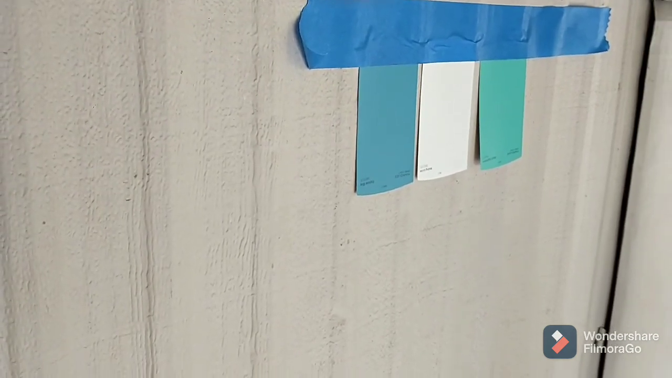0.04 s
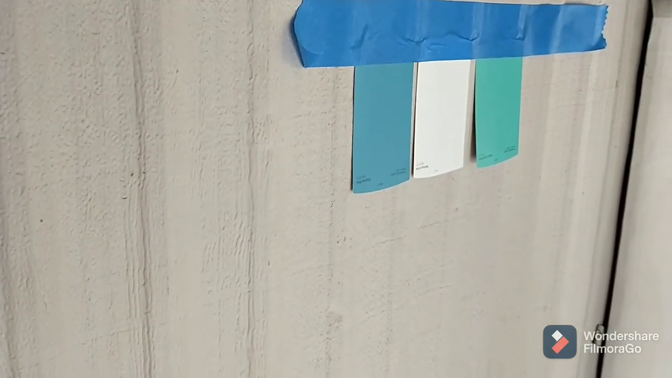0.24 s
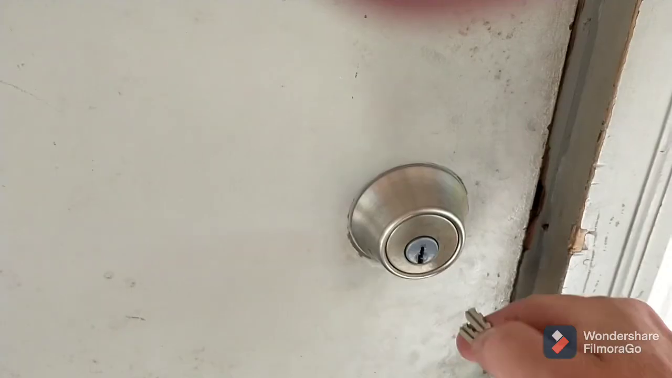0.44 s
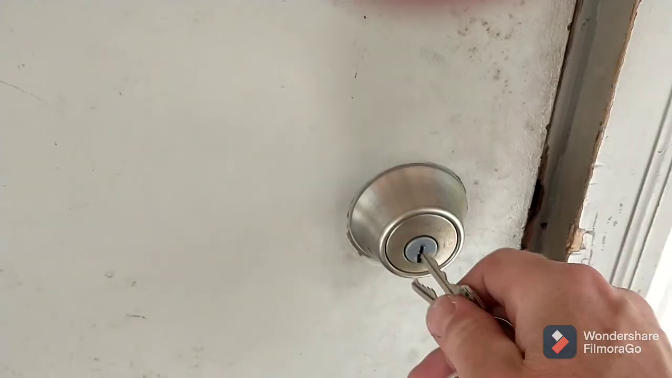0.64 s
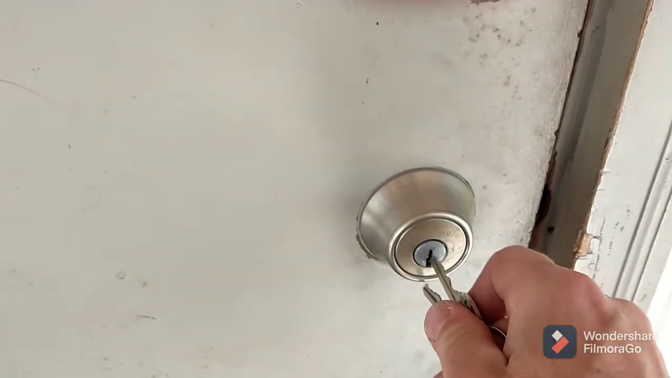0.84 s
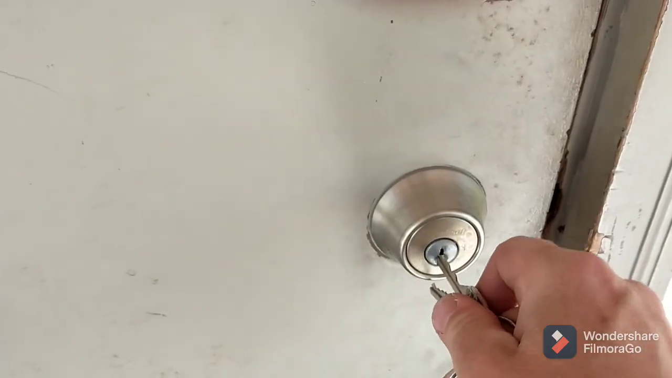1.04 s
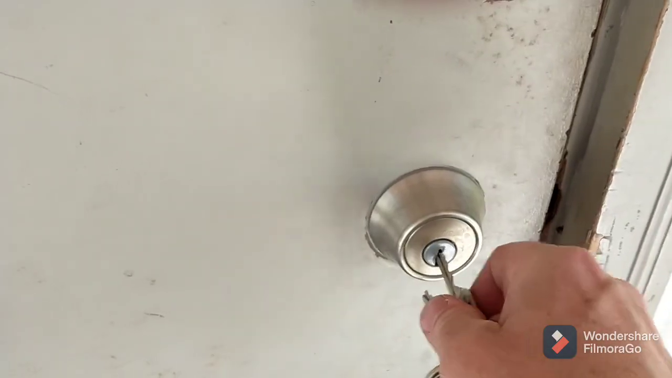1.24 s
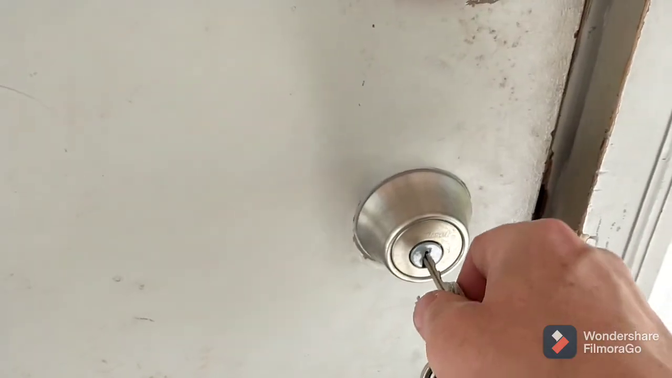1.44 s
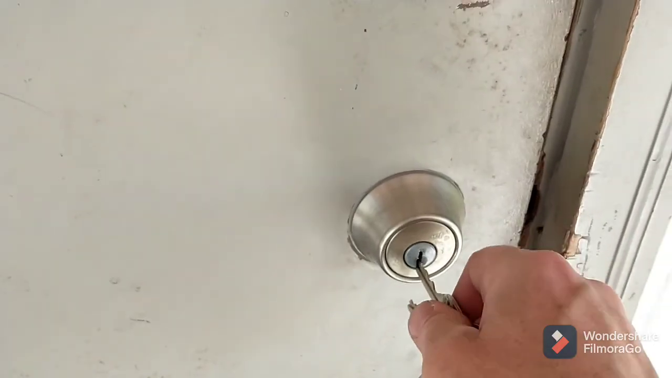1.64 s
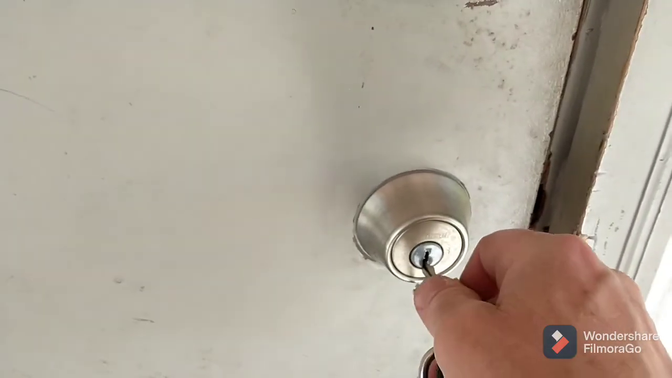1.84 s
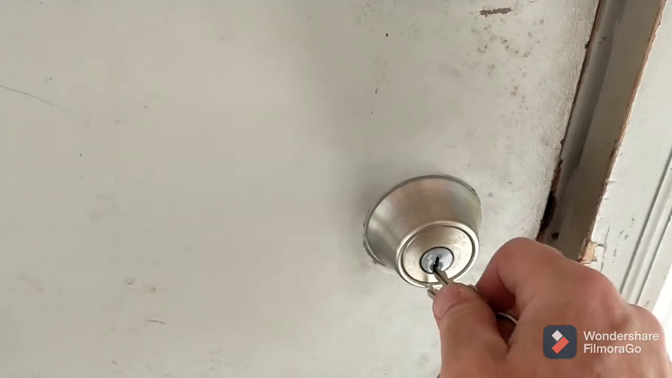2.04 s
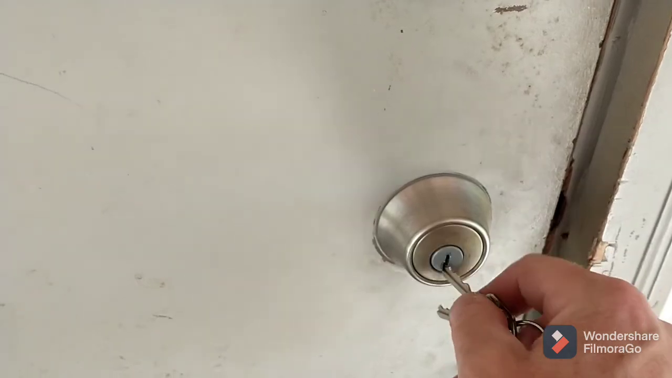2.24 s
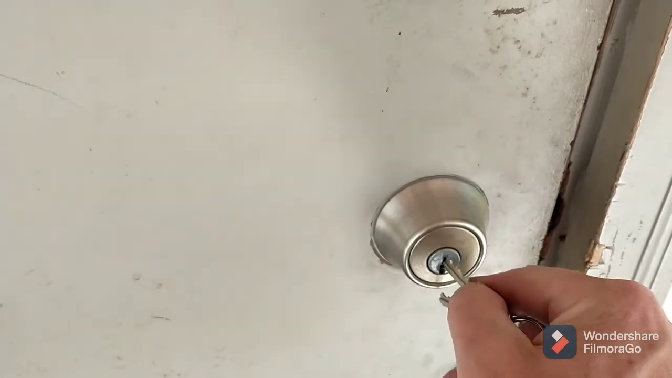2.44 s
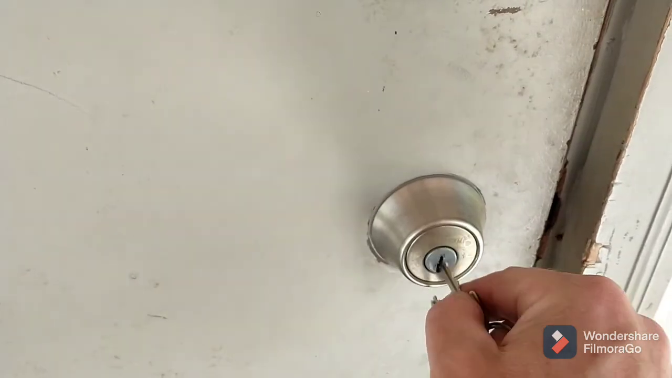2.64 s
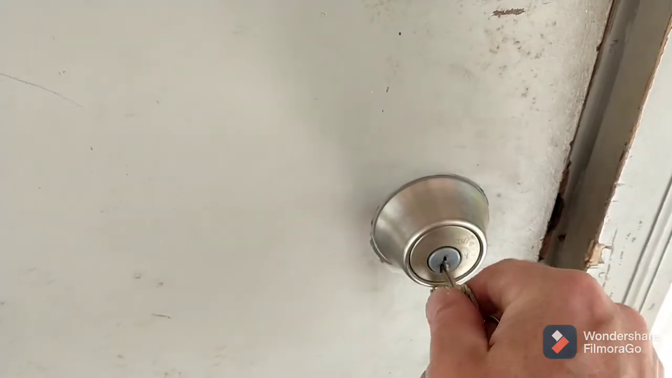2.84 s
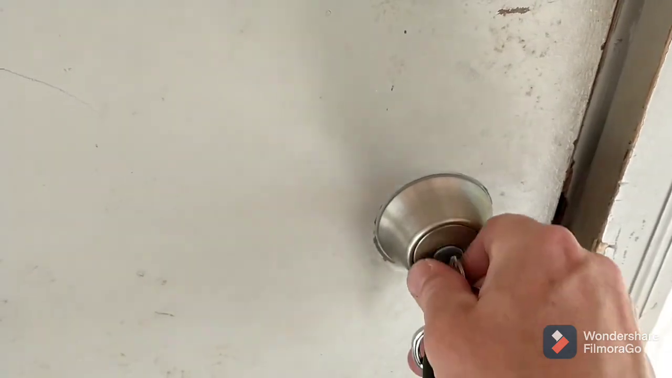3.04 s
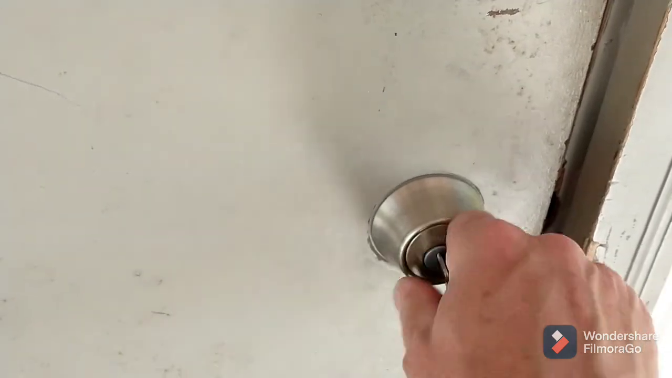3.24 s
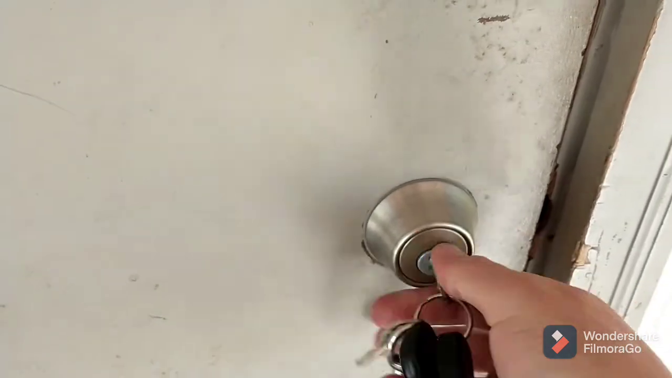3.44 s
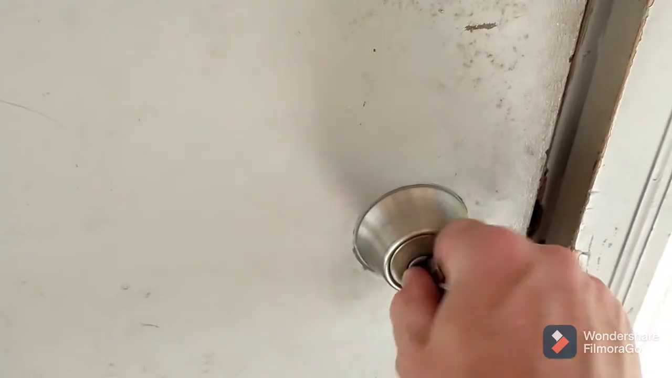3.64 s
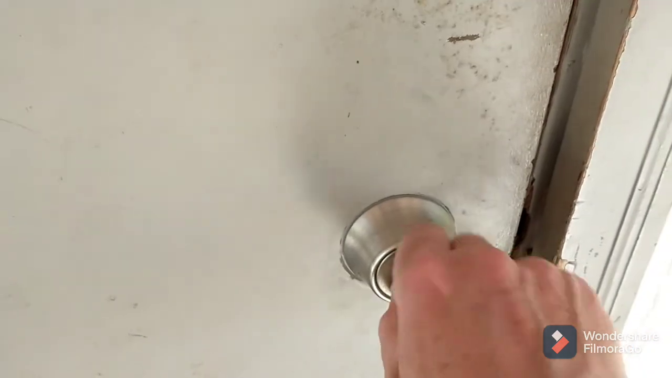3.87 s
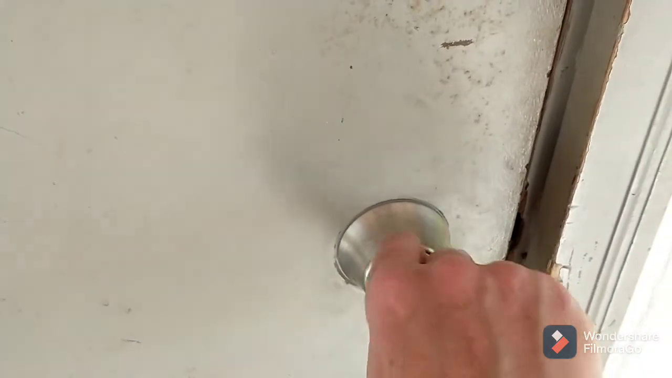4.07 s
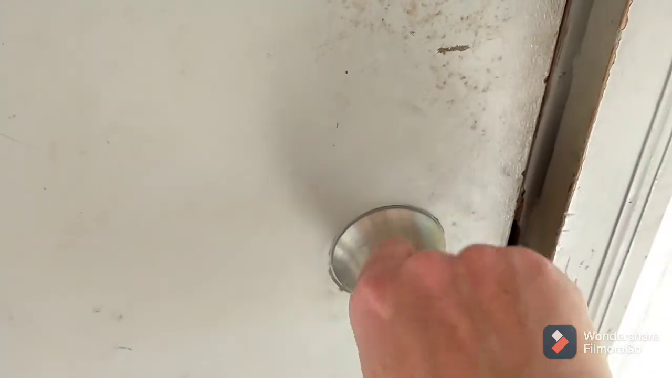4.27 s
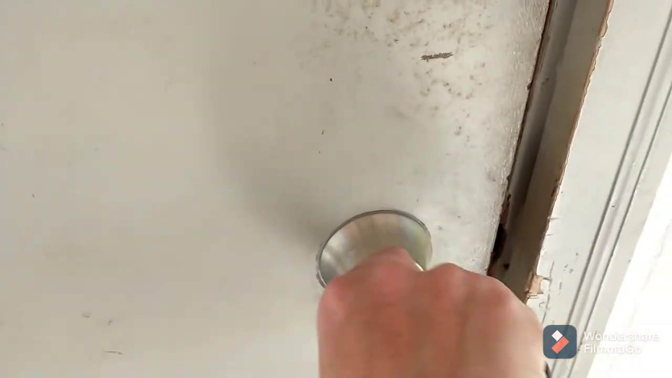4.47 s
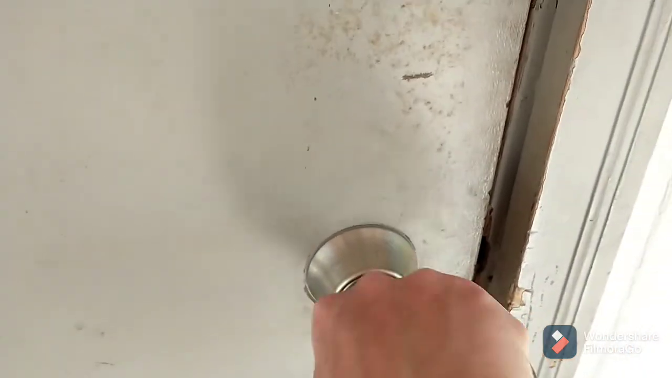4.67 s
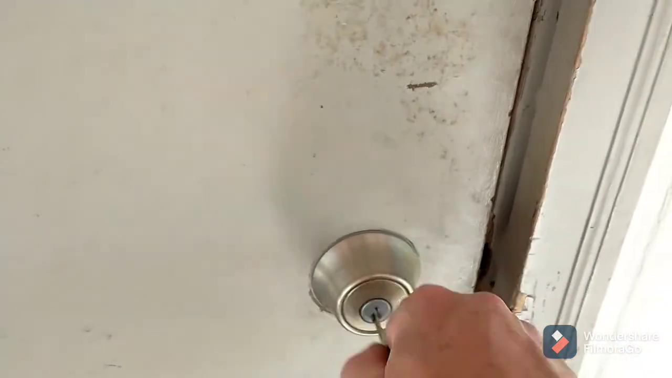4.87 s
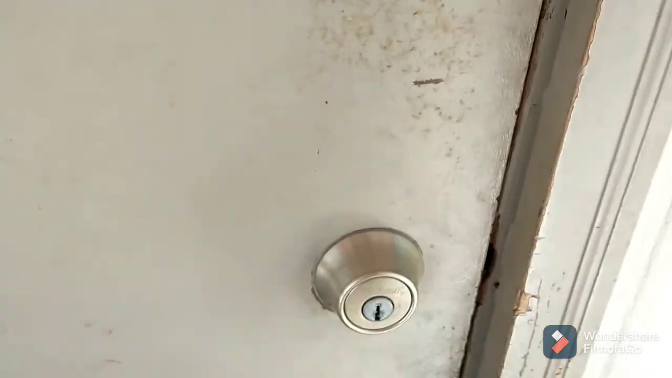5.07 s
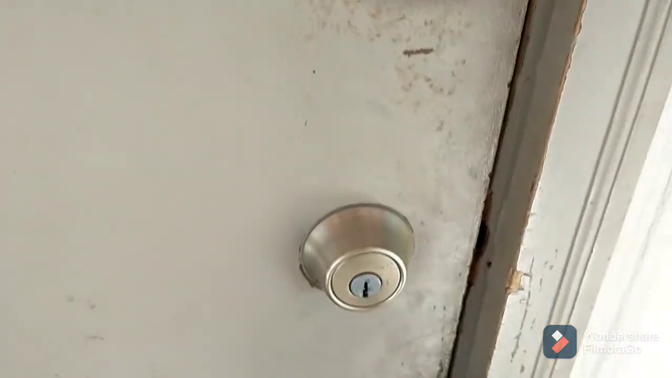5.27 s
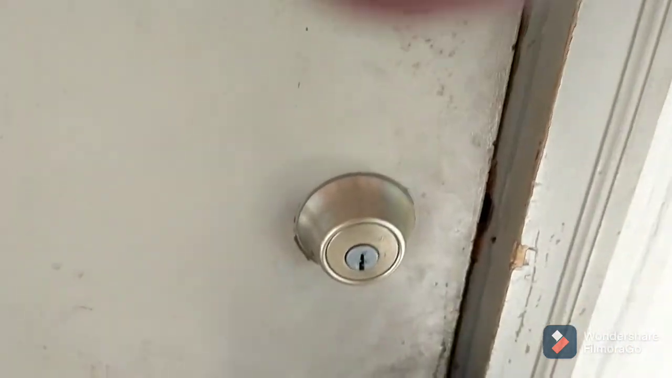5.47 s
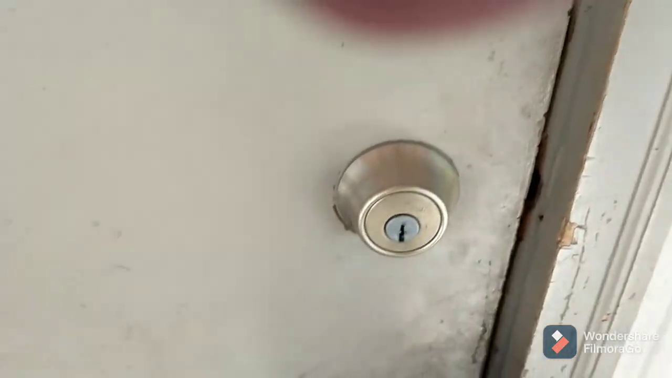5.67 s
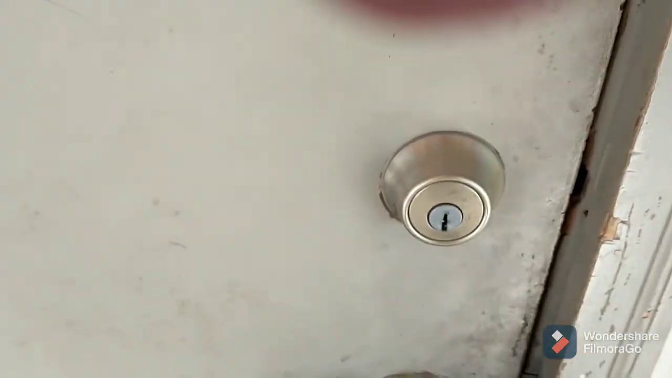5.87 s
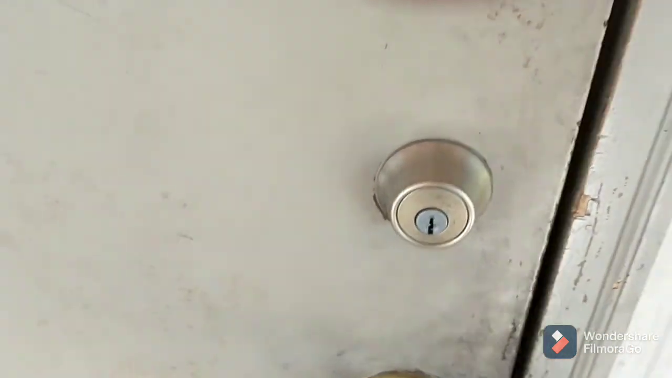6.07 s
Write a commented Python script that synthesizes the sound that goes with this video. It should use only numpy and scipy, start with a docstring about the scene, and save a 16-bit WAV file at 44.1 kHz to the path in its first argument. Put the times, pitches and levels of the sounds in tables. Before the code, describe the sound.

Close, dry metallic sounds on a porch with short reflections and a faint low hum. Key jingle comes first, then sparse tiny clicks as the key works in the deadbolt. A rattling burst of clacks gives way to ringing keys and dull sliding metal. A brief squeak leads into the loudest moment, a hard bolt snap shaking the door, followed by soft clinks and crunchy grit underfoot.

```python
"""At the outside of a house door, heard close by: a bunch of keys jingles and a key clicks over the lock's pins.
The cylinder clacks, loose keys clink, then the bolt grinds and squeaks home, and gritty scuffs follow.
Each blow is noise plus decaying modes; sliding is a stream of tiny slips; the lock's thuds shake the door.
Short porch reflections surround them, over steady air and a quiet outdoor hum made of filtered noise."""
import sys
import numpy as np
from scipy import signal
from scipy.fft import rfft, irfft
from scipy.io import wavfile
from scipy.ndimage import uniform_filter1d

SR = 44100
rng = np.random.default_rng(int(sys.argv[2]) if len(sys.argv) > 2 else 0)


def wav_out(sig):
    """Save sig, one row per channel (or a flat mono array), as 16-bit PCM at SR to the path in sys.argv[1]."""
    wavfile.write(sys.argv[1], SR, np.round(np.clip(np.atleast_2d(sig).T, -1, 1) * 32767).astype(np.int16))


N = 269229

# The key rides over the pins:
# (time [s], thud level [dB], ring level [dB], tick level [dB], contact pitch [Hz])
PIN_CLICKS = [(.9356, -48, -46, -53.5, 1900), (1.0356, -53, -43.5, -48, 2270),
              (1.1041, -54, -46, -58, 2105), (1.1628, -48.5, -48.5, -62, 2200),
              (1.2913, -44, -41, -43.5, 2850), (1.3156, -69, -45, -47, 2180),
              (1.425, -46, -51, -51.5, 2440), (1.6874, -48, -58, -57, 2200),
              (1.7165, -58, -49.5, -60, 2080), (1.7515, -48, -44.5, -51, 2660),
              (1.7959, -59, -46.5, -48.5, 2240), (1.8549, -63, -44, -48, 2210),
              (1.8984, -73, -47.5, -63, 2180), (1.9314, -62.5, -43, -55.5, 2210),
              (2.366, -43.5, -45, -46.5, 1810), (2.5157, -66, -41.5, -66, 1840),
              (2.6951, -60, -52.5, -59, 2860), (2.8532, -48.5, -46, -54.5, 1920),
              (2.9328, -62, -53, -62, 2180), (3.0466, -55, -43.5, -49, 2900)]
# What each part rings with: (frequency [Hz], relative level [dB], ring time to -60 dB [s])
PIN_MODES = [(2116, 15.5, 0.024), (2246, 7.5, 0.07), (2980, -35, 0.015), (3880, 4, 0.021),
             (4200, -1.5, 0.036), (5730, -20, 0.022)]
BOLT_MODES = [(177, -21.5, 0.1), (217, -15.5, 0.25), (346, -10, 0.094), (1840, -3, 0.063), (1886, 1, 0.023),
              (2190, -19.5, 0.19), (2370, 0.5, 0.05), (2462, 5, 0.06), (2660, -13, 0.033),
              (2750, -10.5, 0.12), (3070, -2.5, 0.049), (4070, -10, 0.068), (6330, -20.5, .05)]
KEY_MODES = [(2145, -1, .07), (2330, -8, .04), (3010, -12, .08), (4877, -5, .12), (5712, -14, .08),
             (6115, -1, .1), (6230, -7, .08), (7133, -7, .16), (10020, -14, .11), (11020, -19, .18)]  # level and ring time of a wholly free key
GRIT_MODES = [(166.7, -9, 0.35), (1110, 0, 0.024), (1840, -7, 0.025), (2380, -26, .03), (5400, -37, .03)]
# The dense, quickly damped vibration under those modes: (frequency [Hz], relative level [dB per Hz])
BOLT_BODY = [(45, -3.5), (72, -4.5), (180, -1.5), (290, -2.5), (450, -8), (700, -3.5), (1000, -21.5),
             (1600, -12), (1900, -2.5), (3050, -8), (3500, -15.5), (4550, -17), (5100, -11.5),
             (6400, -13.5), (9000, -32)]
KEY_BODY = [(60, -33.5), (200, -0.5), (600, -4), (1600, -13.5), (2200, 1.5), (3400, -3.5), (4400, -3),
            (5400, 1), (6300, 3.5), (9000, -17)]
GRIT_BODY = [(50, -14.5), (170, 4), (350, -2.5), (530, -8), (950, 0.5), (1400, -2), (1850, 4.5),
             (2800, -1.5), (3400, -15.5), (4400, -19), (5400, -11), (9000, -30.5)]


def amp(db):
    """Decibels to gain."""
    return 10 ** (np.asarray(db) / 20)


def unit(x):
    """Scales to rms 1."""
    return x / np.sqrt(np.mean(x ** 2) + 1e-30)


def read(points, hz):
    """Joins (Hz, value) points on a log-frequency axis."""
    f, value = np.transpose(points)
    return np.interp(np.log(hz + 1), np.log(f + 1), value)


def colour(x, points, size=2048):
    """Causal filter with the given spectrum, so that attacks stay sharp."""
    hz = abs(np.fft.fftfreq(size, 1 / SR))
    log_gain = np.log(amp(read(points, hz)))
    minimum_phase = np.exp(np.conj(signal.hilbert(log_gain)))
    taps = np.fft.ifft(minimum_phase).real[:size // 2]
    return signal.fftconvolve(np.atleast_2d(x), taps[None], axes=1)[:, :x.shape[-1]]


def split(x):
    """The thud, ring and tick bands of a sound."""
    # Band edges: (low [Hz], high [Hz])
    band_edges = [(58, 1200), (1200, 3600), (3600, 15000)]
    filters = [signal.butter(4, edges, "band", fs=SR, output="sos") for edges in band_edges]
    return [signal.sosfilt(sos, x) for sos in filters]


def add(mix, s, sound):
    """Mixes a sound in at time s."""
    part = mix[max(round(s * SR), 0):][:len(sound)]
    part += sound[:len(part)]


def ring(x, modes):
    """The modes of a part, driven by x."""
    t = np.arange(SR // 5) / SR
    response = np.zeros(len(t))
    for k, (hz, db, t60) in enumerate(modes):
        response += (-1) ** k * amp(db - 60 * t / t60) * np.sin(2 * np.pi * hz * t)
    return signal.oaconvolve(x, response)[:N]


def chatter(rows, gap_s, loss_db, contact_hz, scatter, uneven=.15):
    """A loose part rebounds at nearly even gaps, each loss_db weaker, never at quite the same spot."""
    contacts = []
    for s, thud_db, ring_db, tick_db, rebounds in rows:
        for k, (late, spot) in enumerate(rng.uniform(-1, 1, (round(rebounds) + 1, 2))):
            delay = gap_s * (k + uneven * late * (k > 0))
            loss = k * loss_db  # a negative loss makes each rebound stronger
            pitch = contact_hz * (1 + scatter * spot)
            contacts.append((s + delay, thud_db - loss, ring_db - loss, tick_db - loss, pitch))
    return contacts


def blows(rows, modes, body, rise_s, crack_t60, rattle_db, rattle_t60, modes_db, contact_db, contact_t60,
          freedom=((0, 1),), size=7000):
    """Each blow is a crack, a short rattle, a ping at the point of contact and the ring of the whole part."""
    rows, t = np.array(rows), np.arange(size) / SR
    times, contact_hz = rows[:, 0], rows[:, 4:]
    hz, db, t60 = np.transpose(modes)
    chance = rng.standard_normal((len(rows), size + 2 * len(hz)))
    grain, weight, place = np.split(chance, [size, size + len(hz)], axis=1)

    noise_decay = amp(-60 * t / crack_t60) + amp(rattle_db - 60 * t / rattle_t60)
    sounds = colour(grain * noise_decay, body)
    sounds += amp(contact_db - 60 * t / contact_t60) * np.sin(2 * np.pi * contact_hz * t)

    waves = np.sin(2 * np.pi * hz[:, None] * t)
    shares = np.sign(place) * amp(modes_db + db + 2 * weight)  # each contact point favours other modes
    for s, sound, share in zip(times, sounds, shares):
        free = np.maximum(np.interp(s + t, *np.transpose(freedom)), .1)
        age = np.cumsum(1 / free) / SR  # a held part rings less and dies sooner
        decay = np.exp(-np.log(1000) * age / t60[:, None])
        sound += free[0] * share @ (waves * decay)
    sounds *= 1 - np.exp(-(t / rise_s) ** 2)  # the vibration builds up through the metal

    out = np.zeros(N)
    attacks = (SR // 100, SR // 200, SR // 200)  # each level holds over the first 5-10 ms
    for band, levels_db, attack in zip(split(sounds), rows[:, 1:4].T, attacks):
        strength = amp(levels_db) / band[:, :attack].std(axis=1)
        for s, gain, sound in zip(times, strength, band):
            add(out, s, gain * sound)
    return out


def rub(strokes, body, modes, slips_per_s, spread_db, clump_db, modes_db):
    """Friction: tiny slips, uneven in size and bunched in clumps, shake the part while it slides."""
    clumps = unit(uniform_filter1d(rng.standard_normal(N), size=250))
    uneven_db = spread_db * np.minimum(rng.exponential(1, N), 3)
    sizes = amp(uneven_db + clump_db * np.clip(clumps, -2, 2))
    slips = rng.choice([-1., 1.], N) * sizes * (rng.random(N) < slips_per_s / SR)
    texture = unit(colour(slips, body)[0]) + amp(modes_db) * unit(ring(slips, modes))
    bands = np.array([unit(band) for band in split(texture)])

    t, power = np.arange(N) / SR, np.zeros((len(bands), N))
    stroke_range_db = 19  # gained over the rise and lost over the fall
    for peak_s, rise_s, fall_s, *levels_db in strokes:
        away = np.maximum((peak_s - t) / rise_s, (t - peak_s) / fall_s)
        sliding = away < 2
        power[:, sliding] += np.outer(amp(levels_db), amp(-stroke_range_db * away[sliding])) ** 2
    return (bands * np.sqrt(power)).sum(0)


def pins():
    """The key rides over the spring-loaded pins, which click and ring briefly."""
    # Damped vibration of the pins: (frequency [Hz], relative level [dB per Hz])
    pin_body = [(50, -25), (100, -1), (280, -1), (550, -8.5), (1200, -13.5), (1900, -0.5), (2500, 7),
                (3300, -6.5), (4500, -13.5), (6200, -4.5), (9000, -33)]
    return blows(PIN_CLICKS, PIN_MODES, pin_body, rise_s=0.00057, crack_t60=0.013, rattle_db=-8.5,
                 rattle_t60=0.074, modes_db=-21.5, contact_db=-6, contact_t60=0.036)


def fidget(start_s, end_s, ticks_per_s):
    """Faint ticks of the pins while the key is wiggled."""
    t = np.arange(N) / SR
    ticks = rng.uniform(0.27, 1, N) * (rng.random(N) < ticks_per_s / SR)
    ticks *= (t > start_s) * (t < end_s)
    return ring(ticks, PIN_MODES)


def cylinder():
    """The cylinder turns and its cam moves the bolt; gives the sound and its contacts."""
    # Clacks: (time [s], thud level [dB], ring level [dB], tick level [dB], rebounds [count])
    clack_rows = [(3.1156, -59, -38.5, -52, 0), (3.1215, -42.5, -30, -33, 0), (3.182, -42.5, -32, -47, 0),
                  (3.1898, -59, -48, -33.5, 0), (3.214, -45, -31, -33.5, 2), (3.246, -39, -29.5, -32.5, 0),
                  (3.2525, -37, -24.5, -32, 4), (3.2952, -36, -32, -44, 0), (3.339, -47.5, -44, -40.5, 1),
                  (3.3759, -44, -34, -63, 0), (3.386, -44, -37, -54, 0)]
    # What the cylinder rings with: (frequency [Hz], relative level [dB], ring time to -60 dB [s])
    cylinder_modes = [(165, -18.5, 0.094), (330, -18.5, 0.06), (1815, -2, 0.072), (2572, -2, 0.11),
                      (2860, -0.5, 0.11), (2960, -1.5, 0.12), (2880, 0.5, 0.074), (3200, -19.5, 0.053),
                      (3440, -19, .03), (4110, -6, .035)]
    # Its damped vibration: (frequency [Hz], relative level [dB per Hz])
    cylinder_body = [(50, -6.5), (140, -5), (350, -6), (700, -10), (1200, -21), (1850, -0.5), (2300, 2.5),
                     (2950, 1.5), (4100, -2), (4500, -12), (6000, -17), (9000, -32)]
    clacks = chatter(clack_rows, gap_s=.0062, loss_db=2.0, contact_hz=2923, scatter=0.055)
    sound = blows(clacks, cylinder_modes, cylinder_body, rise_s=.0007, crack_t60=.013, rattle_db=-14,
                  rattle_t60=.05, modes_db=-21, contact_db=-11, contact_t60=.028)
    return sound, clacks


def bolt():
    """The bolt knocks in its case and on the strike plate; gives the sound and its contacts."""
    # Knocks: (time [s], thud level [dB], ring level [dB], tick level [dB], rebounds [count, rounded])
    knock_rows = [(3.8336, -51, -39, -45, 0), (3.8742, -49, -34, -65, 0), (4.103, -46.5, -47, -45, 0),
                  (4.215, -54, -44.5, -58, 0), (4.7929, -53, -38.5, -61, 0), (4.811, -48, -38.5, -55, 1),
                  (5.0082, -37.5, -26, -40.5, 0), (5.0379, -32.5, -27.5, -36.5, 0.5),
                  (5.0626, -55, -27, -28.5, 0), (5.071, -30.5, -24.5, -39, 0), (5.0847, -41, -25.5, -37, 1),
                  (5.0982, -31, -22.5, -37, 1), (5.1183, -41, -17, -45, 0), (5.1244, -36.5, -15, -29.5, 0)]
    knocks = chatter(knock_rows, gap_s=.0075, loss_db=0.5, contact_hz=2810, scatter=.08)
    sound = blows(knocks, BOLT_MODES, BOLT_BODY, rise_s=0.00096, crack_t60=0.019, rattle_db=-15.0,
                  rattle_t60=0.054, modes_db=-23, contact_db=-8.5, contact_t60=0.024)
    return sound, knocks


def lock_rub():
    """Metal slides in the lock and shakes the bolt in swelling strokes."""
    # Strokes before the mix gain:
    # (peak time [s], rise [s], fall [s], thud level [dB], ring level [dB], tick level [dB])
    lock_strokes = [(1.035, 0.09, 0.035, -60, -51.5, -61), (1.19, 0.053, 0.081, -48, -59, -71),
                    (1.765, .03, 0.026, -47, -49, -50.5), (2.347, 0.013, 0.034, -47, -53, -54.5),
                    (2.55, 0.11, 0.29, -66, -59, -76), (2.72, .2, 0.35, -62.5, -61.5, -74),
                    (3.06, .15, 0.089, -61, -53.5, -58.5), (3.14, 0.11, 0.27, -47.5, -48, -59),
                    (3.27, 0.12, .09, -45, -40.5, -43.5), (3.44, 0.19, 0.32, -55.5, -52, -57),
                    (3.83, .22, 0.17, -44, -39, -49.5), (4.11, 0.11, 0.15, -55, -50.5, -53),
                    (4.23, 0.067, 0.14, -55, -51, -58), (4.51, 0.063, 0.12, -51.5, -49.5, -58.5),
                    (4.82, 0.053, 0.059, -42, -41, -52), (5.03, 0.12, .08, -39, -42, -54),
                    (5.1, 0.066, 0.075, -45, -25.5, -45)]
    return rub(lock_strokes, BOLT_BODY, BOLT_MODES, slips_per_s=1800, spread_db=2.5, clump_db=4, modes_db=-6.5)


def level_curve(s, db):
    """Follows a level curve, fading in and out beyond its ends."""
    t = np.arange(N) / SR
    outside = np.maximum(np.maximum(s[0] - t, t - s[-1]), 0)
    return amp(np.interp(t, s, db)) * np.exp(-np.minimum(outside / .015, 30))


def squeak():
    """The dry cam drags: fast stick and slip keeps the upper modes of the lock singing."""
    # Squeak loudness before the mix gain: (time [s], level [dB])
    squeak_levels = [(4.77, -86), (4.796, -36.5), (4.814, -33.5), (4.888, -61), (4.912, -42), (4.986, -56),
                     (5.0, -38.5)]
    # Singing modes: (frequency [Hz], relative level [dB], ring time to -60 dB [s])
    squeak_modes = [(2850, -3, 0.024), (2985, -1.5, .045), (3130, -6, .035), (3220, -3.5, .025)]
    slips = rng.uniform(0.46, 1, N) * (rng.random(N) < 900 / SR)  # 900 slips per second on average
    return unit(ring(slips, squeak_modes)) * level_curve(*np.transpose(squeak_levels))


def door(knocks):
    """The thud of each blow in the lock shakes the door panel."""
    # Panel modes: (frequency [Hz], relative level [dB], ring time to -60 dB [s])
    door_modes = [(72.3, -13, 0.28), (81, -8.5, 0.14), (111, -6, 0.11), (161.9, 0, 0.21), (194, -1.5, 0.18),
                  (236.3, -10, 0.14), (332.6, -2.5, 0.13)]
    pushes = np.zeros(N)
    for s, thud_db, *_ in knocks:
        pushes[round(s * SR)] += amp(thud_db) * rng.choice([-1, 1])
    return ring(pushes, door_modes)


def key_freedom():
    """Factor on the keys' ring and ring time as fingers let go and close again in 15 ms."""
    # The keys swing clear of the fingers: (start [s], end [s], factor on ring and ring time)
    key_swings = [(3.54, 3.622, 0.75), (3.762, 3.99, .55), (5.48, 5.506, 0.82)]
    held = 0.27  # fingers and neighbouring keys damp them
    points = [(0, held)]
    for start, end, free in key_swings:
        points += [(start - .015, held), (start, free), (end, free), (end + .015, held)]
    return points


def key_tips(contacts, tip_hz):
    """A clink whose tick outweighs its ring lands on the tip of a key and pings high."""
    return [(s, thud_db, ring_db, tick_db, tip_hz if tick_db > ring_db else hz)
            for s, thud_db, ring_db, tick_db, hz in contacts]


def keys():
    """Loose keys meet on the ring and chime, more freely when the fingers let go."""
    # Clinks: (time [s], thud level [dB], ring level [dB], tick level [dB], rebounds [count, rounded])
    clink_rows = [(.073, -59, -46, -40.5, 0), (.0776, -70, -44.5, -43, 0), (.12, -62, -54, -42, 1),
                  (.209, -72, -49, -48, 0.23), (.2276, -63, -54, -41.5, 0), (.4464, -66, -46, -49, 0),
                  (.6236, -69, -43, -53, 0), (3.5564, -58, -41.5, -33.5, 1), (3.5789, -56, -31, -32.5, 0),
                  (3.5935, -54, -33.5, -35.5, 0), (3.6325, -53, -39.5, -40.5, 0),
                  (3.7008, -53, -43.5, -52, 0), (3.7368, -50.5, -35.5, -46, 2),
                  (3.7741, -53, -33.5, -34, 0), (3.7903, -48, -27, -37, 0.56), (3.7971, -47, -53, -30.5, 0),
                  (3.9627, -58.5, -44.5, -41, 1), (5.1682, -58, -40, -36, 0), (5.3526, -71, -43.5, -49, 0),
                  (5.3831, -67, -43, -47, 1), (5.4044, -70, -49, -44.5, 0), (5.4643, -69, -45, -47, 0),
                  (5.483, -67, -47, -28, 0), (5.5118, -63, -43, -34, 0), (5.749, -48.5, -39, -36.5, 0)]
    clinks = chatter(clink_rows, gap_s=0.009, loss_db=1.0, contact_hz=2197, scatter=0.067)
    clinks = key_tips(clinks, tip_hz=6020)
    return blows(clinks, KEY_MODES, KEY_BODY, rise_s=.0008, crack_t60=.012, rattle_db=-11, rattle_t60=.05,
                 modes_db=-6, contact_db=-5, contact_t60=.028, freedom=key_freedom())


def key_rub():
    """Keys slide over each other, and their slips excite the key modes."""
    # Strokes before the mix gain:
    # (peak time [s], rise [s], fall [s], thud level [dB], ring level [dB], tick level [dB])
    key_strokes = [(.01, 0.39, 0.36, -56, -51.5, -51), (.645, .03, 0.055, -70, -52, -52.5),
                   (.81, 0.12, 0.12, -70, -58.5, -60), (3.595, 0.058, 0.044, -55, -42.5, -35.5),
                   (5.27, 0.44, 0.36, -62.5, -49, -60.5), (5.5, 0.22, 0.15, -71, -47.5, -49.5)]
    return rub(key_strokes, KEY_BODY, KEY_MODES, slips_per_s=2500, spread_db=4.0, clump_db=4.5, modes_db=-8.0)


def key_ring(top_hz, travel_s, peak_s):
    """Bending waves run along the wire, treble fastest, so each snap is a very short falling zip."""
    # The key ring slips, before the mix gain: (time [s], level [dB])
    ring_snaps = [(3.115, -43), (3.1954, -35), (3.339, -31), (3.3424, -28.5), (3.6316, -21), (3.7359, -30),
                  (4.9126, -35.5), (5.1682, -32), (5.2143, -33.5), (5.5114, -30)]
    t, out = np.arange(SR // 50) / SR, np.zeros(N)
    hz = top_hz / (1 + t / travel_s) ** 2
    envelope = t / peak_s * np.exp(1 - t / peak_s)
    zip_sound = np.sin(2 * np.pi * np.cumsum(hz) / SR) * envelope
    for s, db in ring_snaps:
        add(out, s, amp(db) * zip_sound)
    return out


def shoe():
    """Grit catches under the sole in dull, crunchy blows."""
    # Scuffs: (time [s], thud level [dB], ring level [dB], tick level [dB], rebounds [count, rounded])
    scuff_rows = [(5.6642, -54.5, -41.5, -37.5, 1), (5.8187, -50, -32.5, -36.5, 0.39),
                  (5.8567, -38.5, -35, -42.5, 0), (5.8968, -46, -33.5, -56, 0),
                  (5.9724, -33.5, -28.5, -33, 2), (6.002, -38, -42, -33.5, 0), (6.0282, -26, -22.5, -31, 0),
                  (6.0731, -45, -30, -39, 0.014)]
    scuffs = chatter(scuff_rows, gap_s=.009, loss_db=-1.1, contact_hz=1860, scatter=0.13)
    return blows(scuffs, GRIT_MODES, GRIT_BODY, rise_s=0.00062, crack_t60=0.022, rattle_db=-4,
                 rattle_t60=0.038, modes_db=-24, contact_db=-2.5, contact_t60=0.036)


def sole_rub():
    """The sole drags over the grit in short strokes."""
    # Strokes before the mix gain:
    # (peak time [s], rise [s], fall [s], thud level [dB], ring level [dB], tick level [dB])
    sole_strokes = [(5.69, 0.064, 0.099, -47.5, -41.5, -40), (5.9, .1, 0.18, -42.5, -40, -51.5),
                    (5.995, 0.1, 0.14, -34.5, -33.5, -37.5)]
    return rub(sole_strokes, GRIT_BODY, GRIT_MODES, slips_per_s=2000, spread_db=3.5, clump_db=3.5, modes_db=-10.5)


def porch(x):
    """Short diffuse reflections from door, frame and porch walls."""
    # Reverberation: (frequency [Hz], decay time to -60 dB [s])
    porch_decay = [(100, 0.11), (260, 0.28), (700, 0.26), (2000, 0.14), (5000, 0.14), (12000, 0.097)]
    taps = rng.standard_normal(SR // 2) * (rng.random(SR // 2) < 3000 / SR)  # 3000 echoes per second
    taps[:SR // 200] = 0  # none in the first 5 ms
    hz, t, z = signal.stft(taps, SR, nperseg=256)
    decay = amp(-60 * t / read(porch_decay, hz)[:, None])
    tail = signal.istft(z * decay, SR, nperseg=256)[1]
    return signal.fftconvolve(x, tail / np.linalg.norm(tail))[:N]


def outdoors():
    """Steady air and a wavering far-off hum, both noise shaped in frequency."""
    # Spectrum of the air: (frequency [Hz], relative level [dB per Hz])
    air_spectrum = [(25, -27), (45, -28.5), (66, 3.5), (105, 2.5), (170, -3.5), (240, -9), (320, -5.5),
                    (450, -12.5), (800, -10), (1350, -12), (2200, -14), (3500, -18.5), (5000, -21),
                    (7400, -28), (8400, -46), (15500, -44.5)]
    # Distant machinery: (frequency [Hz], level [dB], width [Hz])
    hum_bands = [(66.8, -79.5, 3.7), (166.3, -71.5, 3.9), (189, -66.5, 5.9)]
    hz = np.fft.rfftfreq(N, 1 / SR)
    air_noise = rfft(rng.standard_normal(N)) * amp(read(air_spectrum, hz))
    background = amp(-60) * unit(irfft(air_noise, N))
    noise = rfft(rng.standard_normal(N))
    for f, db, width in hum_bands:
        background += amp(db) * unit(irfft(noise * np.exp(-((hz - f) / width) ** 2), N))
    return background


def scene():
    """Lock, door, keys and shoe, with the porch around them."""
    # Microphone response: (frequency [Hz], gain [dB])
    microphone = [(20, 0), (7300, -2), (7900, -5), (8450, -22.5), (11000, -22), (12000, -38.5),
                  (15500, -24)]
    cylinder_sound, clacks = cylinder()
    bolt_sound, knocks = bolt()
    near = pins() + cylinder_sound + bolt_sound + keys() + shoe()
    near += amp(-3) * lock_rub() + amp(-3.5) * key_rub() + amp(-1) * sole_rub()
    near += amp(-3.5) * squeak() + amp(-5.5) * door([*PIN_CLICKS, *clacks, *knocks])
    near += amp(-7.0) * key_ring(top_hz=8200, travel_s=0.00713, peak_s=0.001)
    near += amp(-63) * fidget(start_s=1.0, end_s=2.3, ticks_per_s=12)
    with_porch = near + amp(-11.5) * porch(near)
    return (colour(with_porch, microphone)[0] + outdoors())[None]


def record(dry):
    """Band limit: a steep low-pass at 15.7 kHz."""
    low_pass = signal.firwin(511, 15700, window=("kaiser", 9), fs=SR)
    return signal.oaconvolve(dry, low_pass[None], "same")


dry = scene()
out = record(dry)
wav_out(out)
```